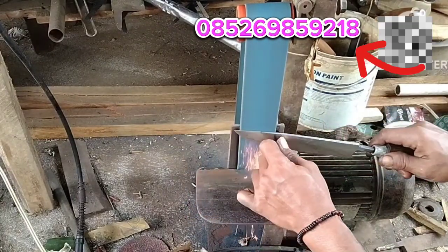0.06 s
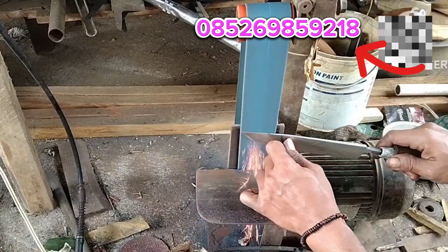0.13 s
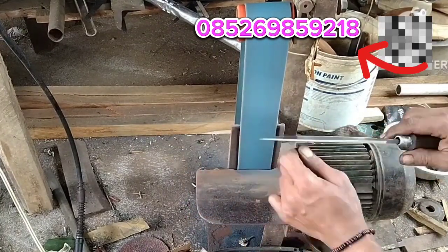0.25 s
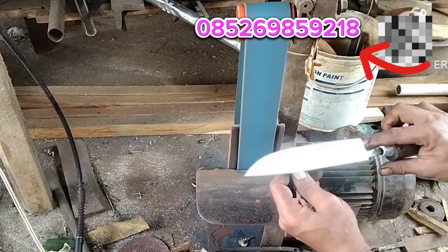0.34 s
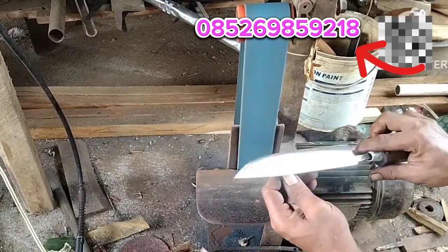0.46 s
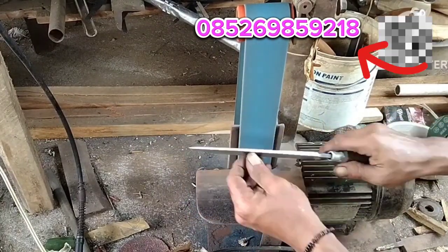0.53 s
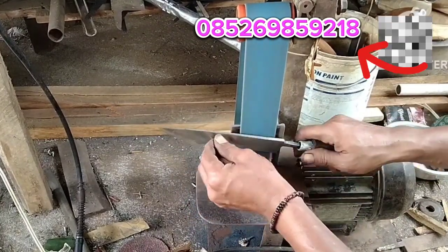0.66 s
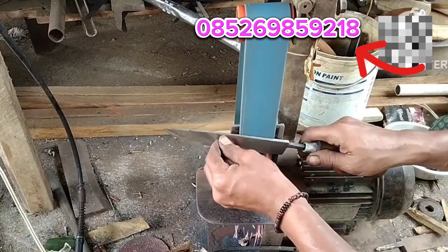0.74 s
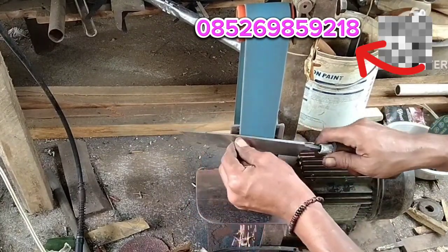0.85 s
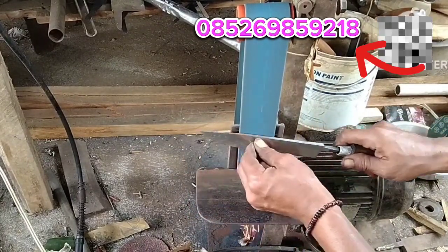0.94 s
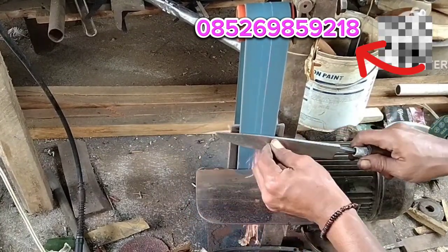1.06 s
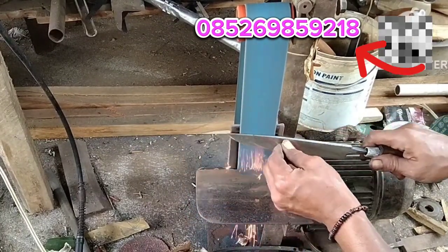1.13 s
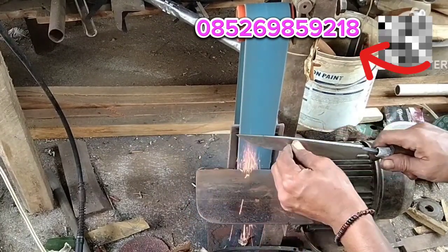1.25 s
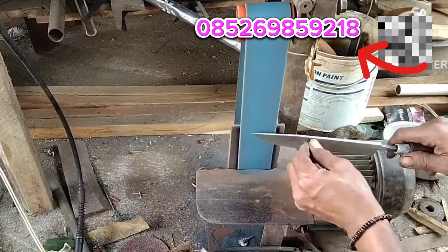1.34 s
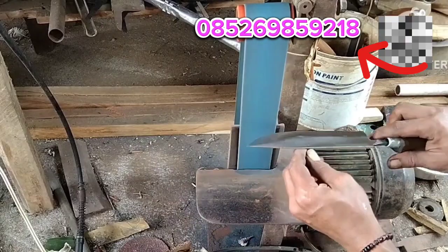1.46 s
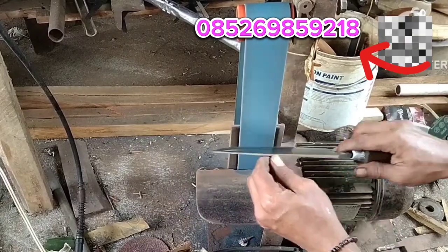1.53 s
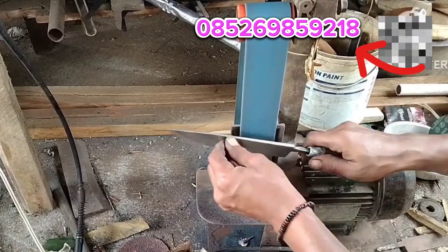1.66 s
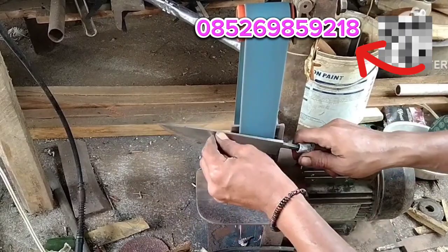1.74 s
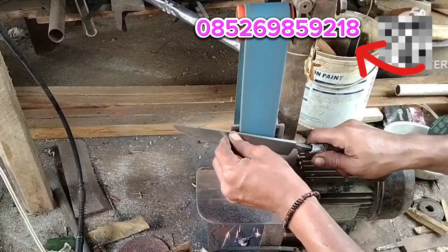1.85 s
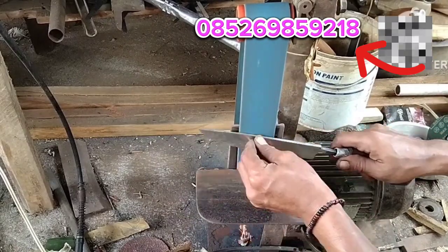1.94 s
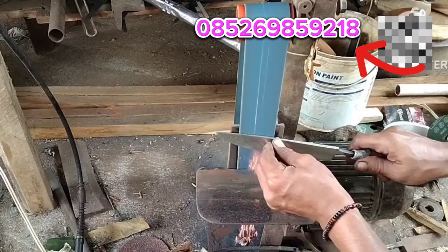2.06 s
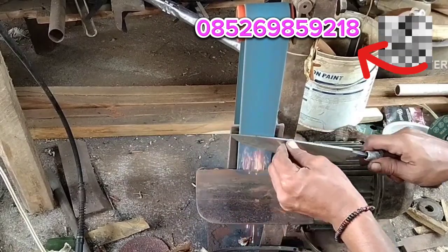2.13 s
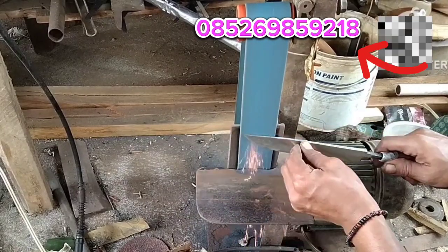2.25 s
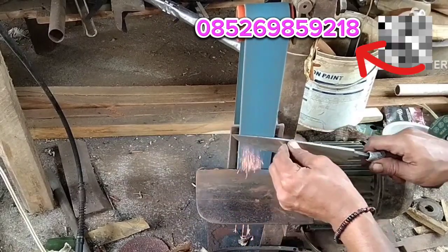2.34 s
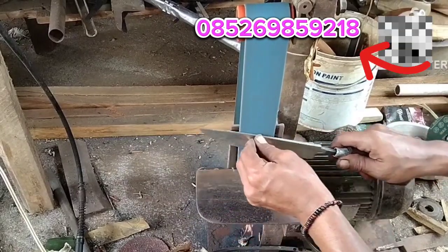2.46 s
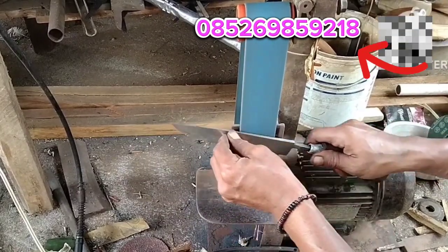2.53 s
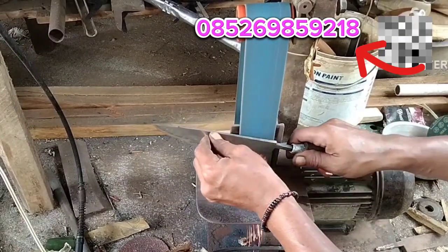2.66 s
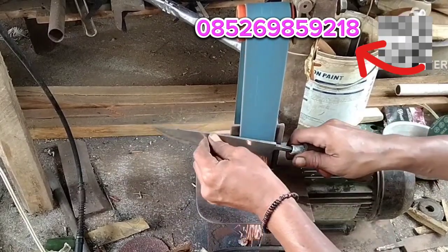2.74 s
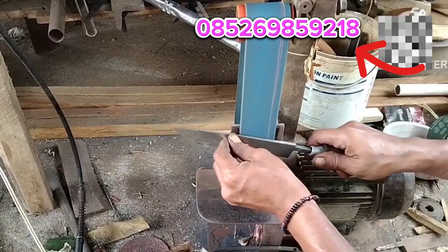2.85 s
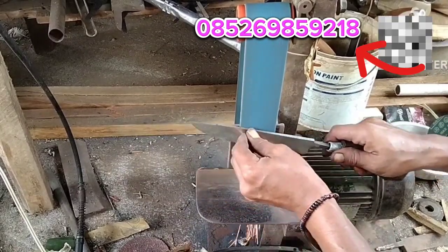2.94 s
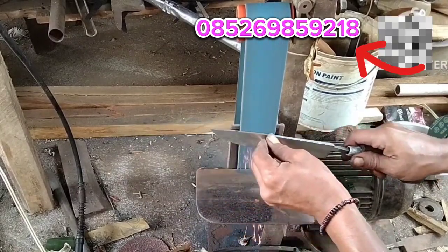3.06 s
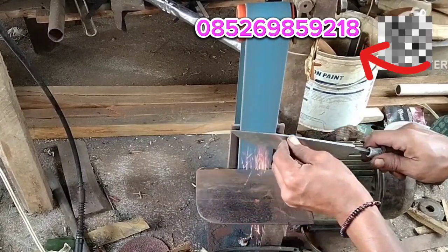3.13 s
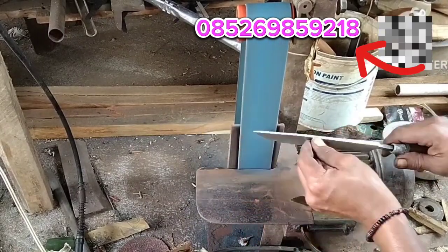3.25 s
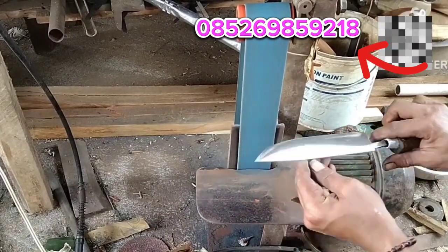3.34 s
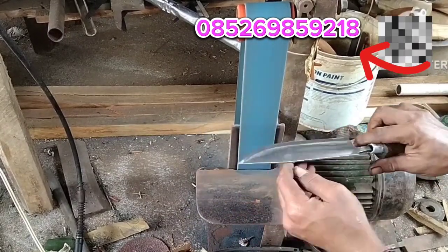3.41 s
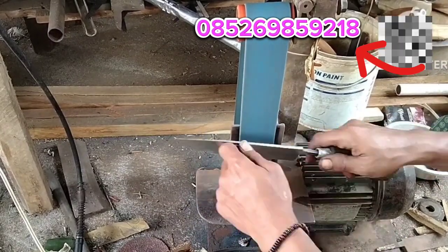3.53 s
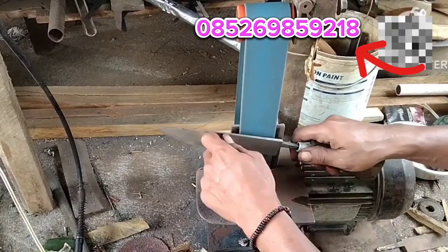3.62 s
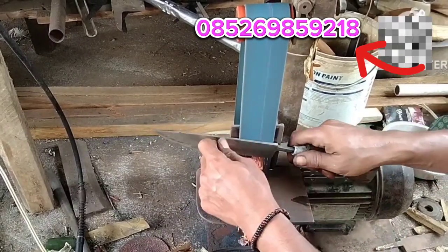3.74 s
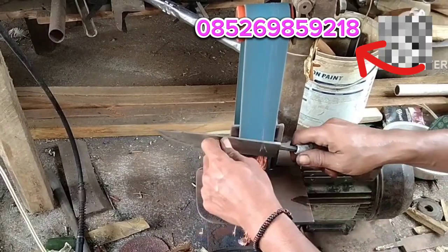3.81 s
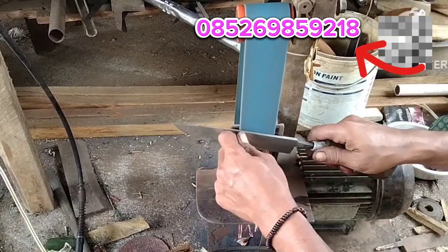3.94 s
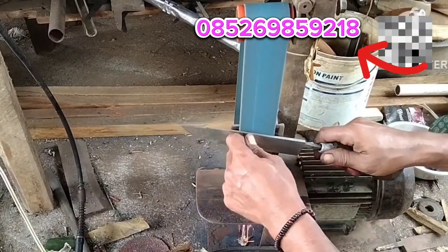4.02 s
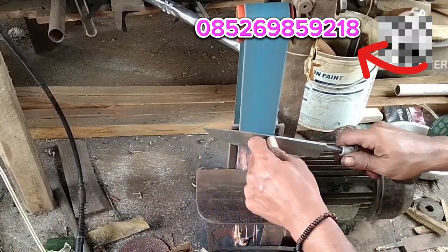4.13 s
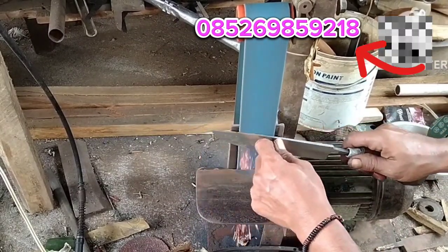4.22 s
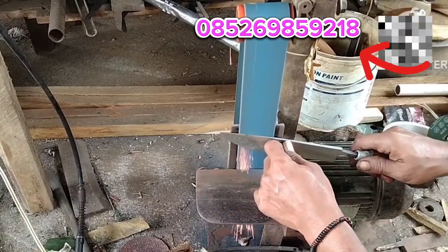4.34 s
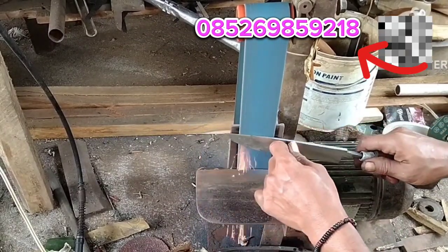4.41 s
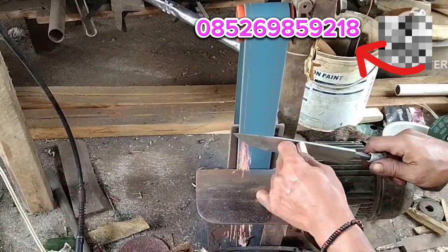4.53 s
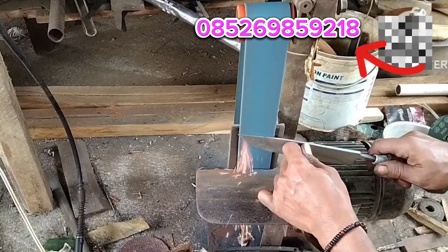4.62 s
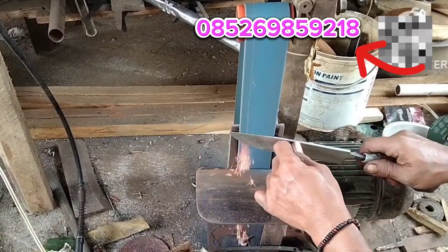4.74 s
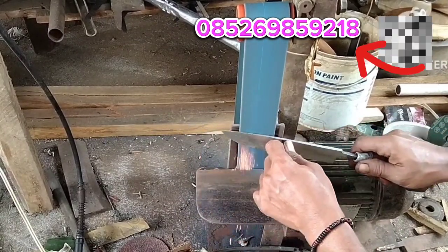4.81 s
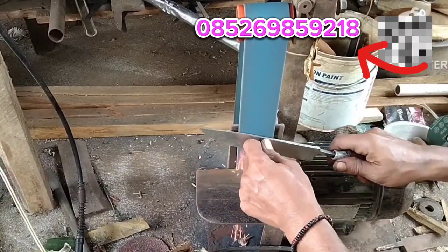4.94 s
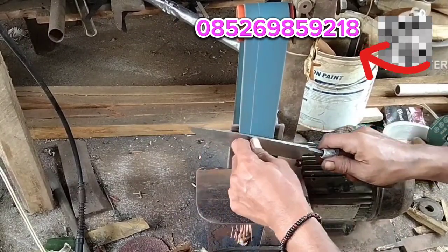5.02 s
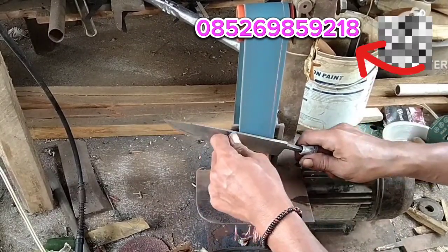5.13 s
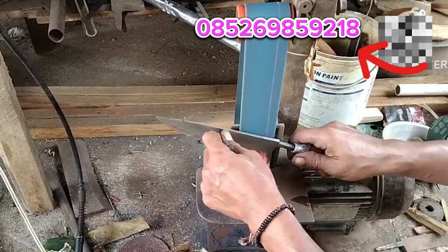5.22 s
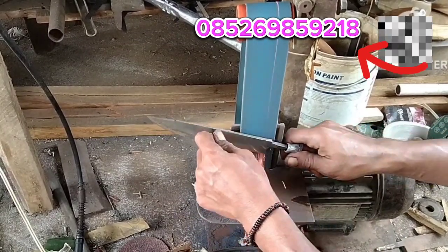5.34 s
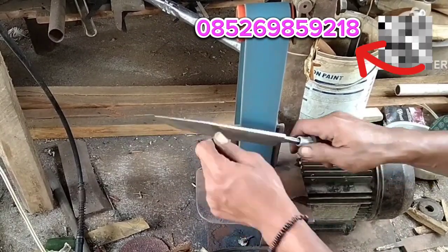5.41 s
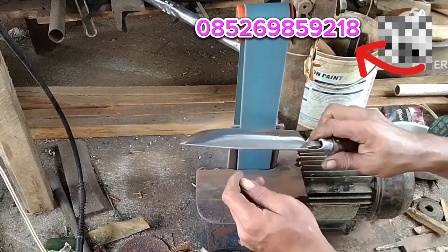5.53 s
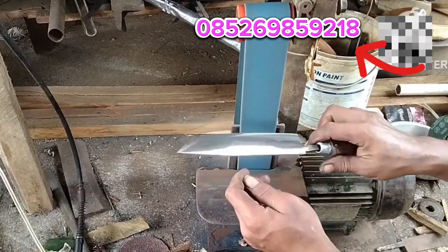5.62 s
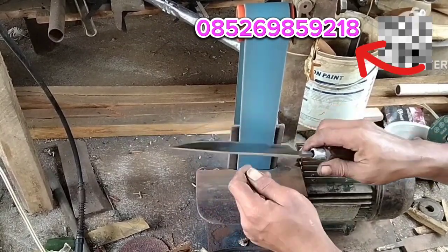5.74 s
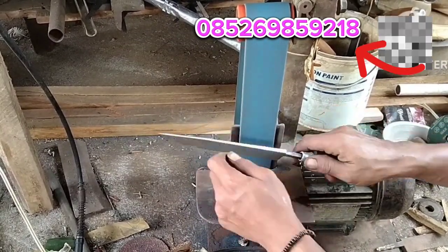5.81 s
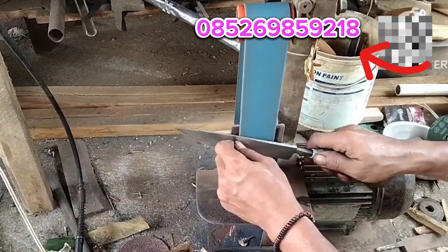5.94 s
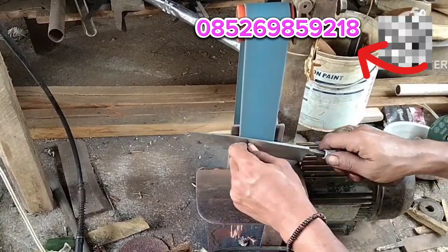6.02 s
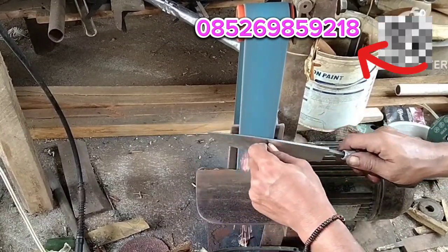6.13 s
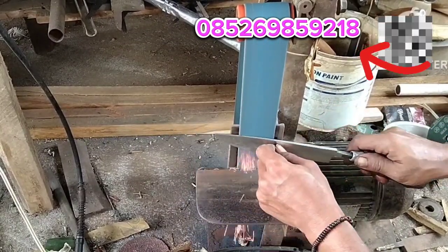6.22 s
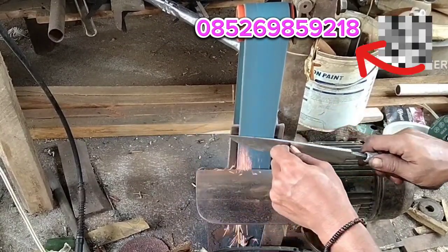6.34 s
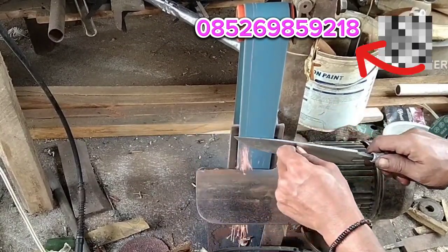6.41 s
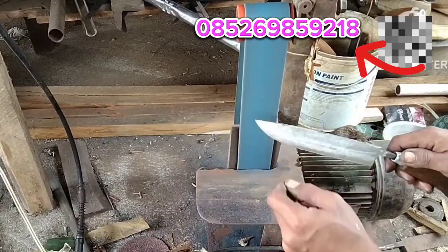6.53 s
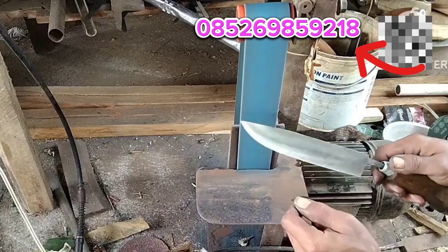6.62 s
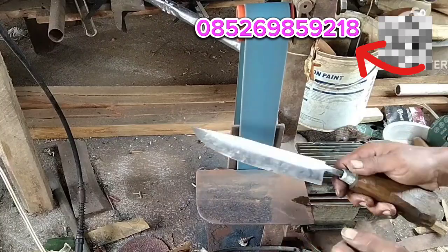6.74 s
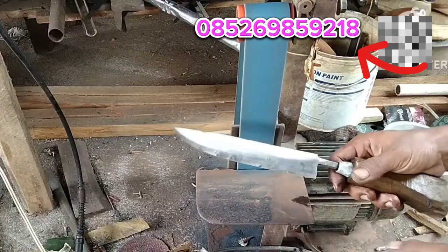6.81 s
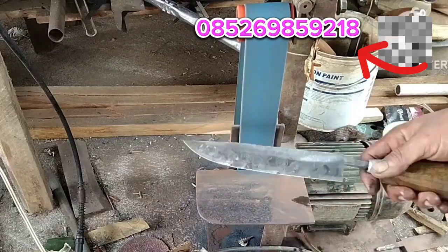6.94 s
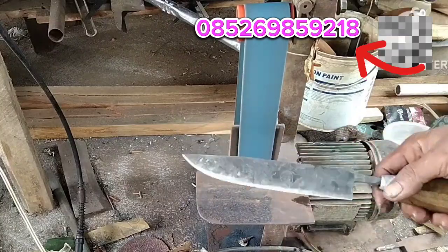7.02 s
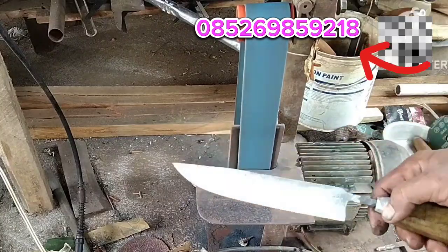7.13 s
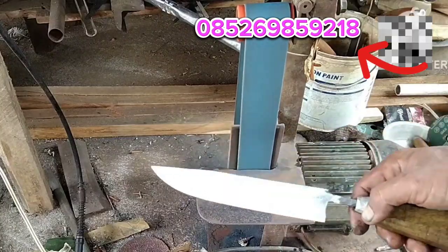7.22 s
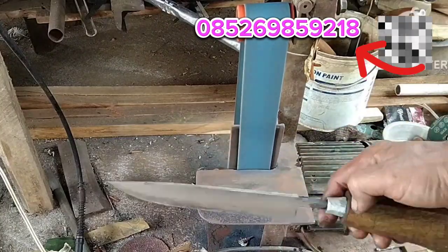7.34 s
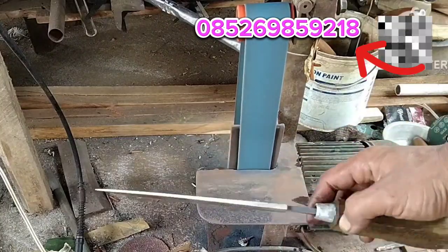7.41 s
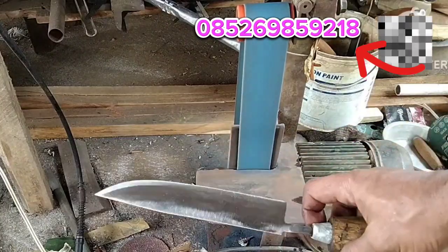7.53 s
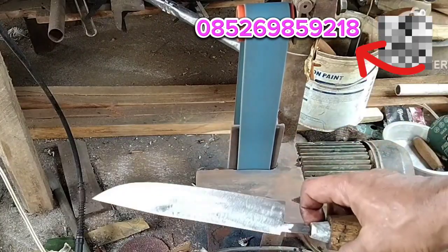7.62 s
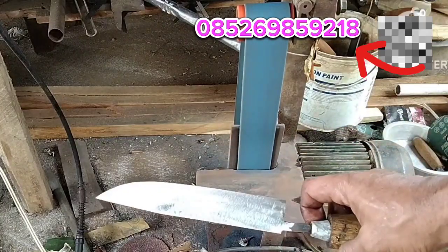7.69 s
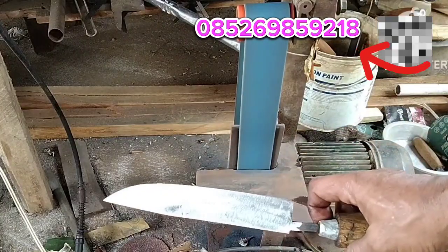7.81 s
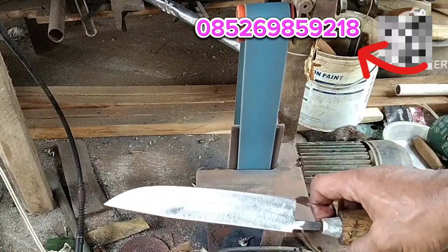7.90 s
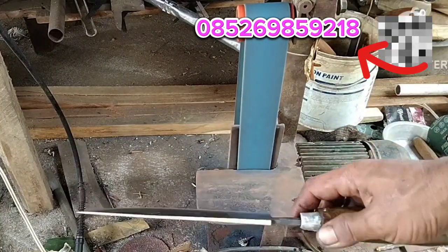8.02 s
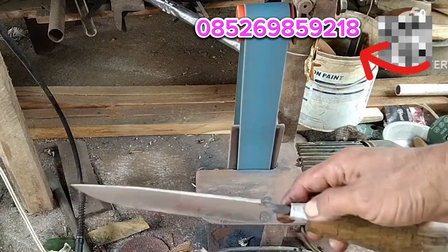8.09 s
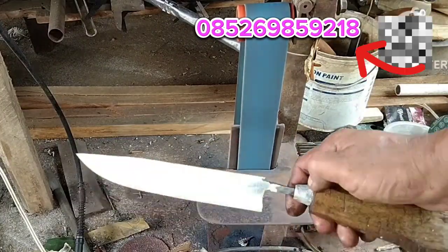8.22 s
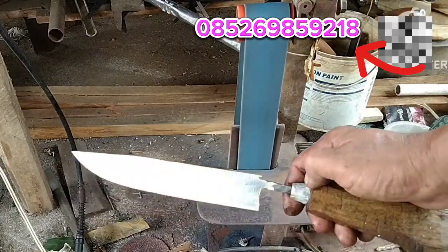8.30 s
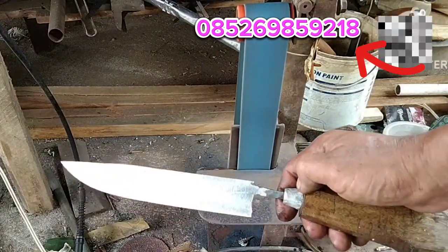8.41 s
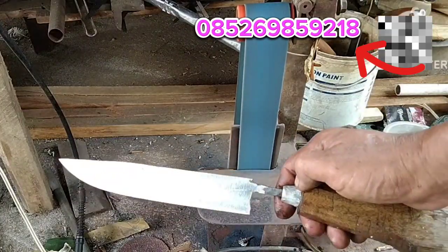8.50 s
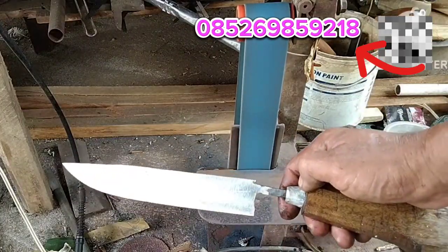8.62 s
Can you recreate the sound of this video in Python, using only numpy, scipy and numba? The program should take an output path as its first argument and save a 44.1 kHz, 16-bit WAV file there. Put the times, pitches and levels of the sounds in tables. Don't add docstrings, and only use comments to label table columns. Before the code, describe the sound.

Belt grinder whines steadily while a knife blade is pressed on in harsh, sizzling strokes of varying length, then lifts and leaves the belt spinning alone.

```python
import sys
import numpy as np
from scipy import signal
from scipy.fft import rfft, irfft
from scipy.io import wavfile
from scipy.ndimage import uniform_filter1d
from numba import njit

SR = 44100
rng = np.random.default_rng(int(sys.argv[2]) if len(sys.argv) > 2 else 0)


def field_ratio(decibels):
    return 10 ** (np.asarray(decibels, dtype=float) / 20)


def master_out(mix):
    frames = np.transpose(np.atleast_2d(mix))
    ceiling = np.clip(frames, -1, 1)
    pcm = np.round(ceiling * 32767).astype(np.int16)
    wavfile.write(sys.argv[1], SR, pcm)


N = 381906
TIME = np.arange(N) / SR
FREQ = np.arange(N // 2 + 1) * SR / N
ROLLER, CAGE = .38, .14


def level(x, db):
    return x * field_ratio(db) / np.sqrt(np.mean(x ** 2))


def walk(rate):
    hold = int(SR / rate)
    steps = np.repeat(rng.standard_normal(N // hold + 1), hold)
    return 1.48 * uniform_filter1d(uniform_filter1d(steps, hold), hold)[:N]


def colour(x, points):
    hz, db = np.transpose(points)
    return irfft(rfft(x) * field_ratio(np.interp(np.log(FREQ + 1), np.log(hz), db)), N)


def curves(table):
    s, *columns = np.transpose(table)
    return [np.interp(TIME, s, column) for column in columns]


def swells(rows):
    return sum(np.outer(db, np.clip(1.34 * (1 - np.abs(TIME - s) / half), 0, 1)) for s, half, *db in rows)


BAND_EDGES_HZ = [500, 950, 1400, 1650, 2800, 5200, 10000]


def split(x):
    below = [np.clip(.5 - 12 * np.log2((FREQ + 1) / hz), 0, 1) for hz in BAND_EDGES_HZ]
    return irfft(rfft(x) * np.diff([0 * FREQ] + below + [1 + 0 * FREQ], axis=0), N)


@njit
def svf(x, hz, width):
    y, band, low = np.empty(len(x)), 0., 0.
    for i in range(len(x)):
        g, k = np.tan(np.pi * hz[i] / SR), width / hz[i]
        v = (band + g * (x[i] - low)) / (1 + g * (g + k))
        band, low, y[i] = 2 * v - band, low + 2 * g * v, k * v
    return y


def grinding(turns, foot_hz):
    grit = rng.standard_normal(N) * field_ratio(1.06 * rng.exponential(1, N) + 0.23 * walk(55) + 0.5 * walk(20))
    blade = split(held_in_the_hand(blade_hiss(grit, foot_hz), foot_hz))
    frame = split(loaded_frame(grit, turns))
    return [*frame[:4], frame[4] + .9 * frame[5], blade[4] + blade[5], *blade[6:]]


# frequency in Hz, level in dB.
GRIND_HIGH = [(1590, -20), (2700, -1), (4160, -1.5), (4780, -4), (5690, -1.5), (6260, -6.5), (6930, -4.5),
              (8890, -1.5), (10000, -3.5), (12100, 1), (15500, -6)]
# frequency in Hz, width in Hz, level in dB.
BLADE = [(4274, 57, -1.5), (4190, 70, 2), (5510, 57, -4.5), (5835, 72, -1.5), (6160, 42, -4), (6830, 56, 5),
         (7265, 190, -2), (7730, 62, 2), (8340, 66, -2.5), (8480, 71, -3), (8700, 125, -9), (9110, 150, 0),
         (9320, 110, -9), (9630, 96, -3), (11640, 300, -4.5), (11870, 220, -8), (13000, 300, -3.5),
         (14700, 220, -3)]


def blade_hiss(grit, foot_hz):
    ring = 0
    for k, (hz, width, db) in enumerate(BLADE):
        mode = svf(grit, hz * (1 + 0.0051 * walk(3.0)), 0.4 * width)
        ring = ring + (-1) ** k * field_ratio(db + 3.6 * walk(4.93)) * mode
    lowest = svf(grit, 0.995 * foot_hz, 240.0) * field_ratio(7.8 * walk(10))
    hiss = level(colour(grit, GRIND_HIGH), -31.5)
    return hiss + level(ring, -39.0) + field_ratio(-2.5) * songs(grit) + level(lowest, -62.0)


# middle in seconds, half length in seconds, level in dB.
SONGS = [
    ((3600, 83), [(.05, 0.11, -51), (.8, 0.11, -47), (1.17, 0.12, -46), (1.9, 0.08, -57), (2.75, 0.35, -49), (3.8, 0.17, -43), (4.87, 0.097, -42), (5.2, 0.31, -44.5), (6.08, 0.08, -43), (6.3, 0.1, -46), (2.5, .06, -43), (4.33, 0.089, -43)]),
    ((4300, 35), [(1.1, 0.15, -45), (2.0, 0.11, -47), (2.35, .1, -44), (4.15, 0.28, -47.5), (4.7, 0.073, -43), (4.97, 0.13, -41), (6.33, .12, -40)]),
    ((5700, 110), [(.82, 0.14, -39.5), (1.15, 0.059, -37), (1.82, 0.12, -40), (2.15, 0.048, -43), (2.55, 0.03, -50), (2.85, 0.066, -39.5), (5.15, 0.15, -43), (6.1, 0.44, -41.5)]),
    ((6600, 70), [(.92, 0.13, -38), (2.52, 0.099, -45), (2.98, .18, -41), (4.6, 0.23, -43)]),
    ((7240, 97), [(.8, .1, -53), (1.88, 0.084, -51.5), (4.58, 0.25, -33.5), (5.05, .2, -42), (6.33, 0.2, -39.5)]),
    ((8320, 110), [(.78, 0.14, -44), (1.3, 0.064, -36), (2.28, 0.13, -39), (2.65, 0.091, -45), (3.2, 0.11, -47), (3.83, .2, -37), (5.25, 0.19, -38.5), (6.05, 0.085, -50)]),
    ((9200, 270), [(1.12, 0.25, -40), (2.15, 0.13, -47), (2.5, 0.13, -50), (2.93, .16, -43), (5.3, 0.13, -37), (6.12, 0.081, -39)]),
    ((11900, 390), [(1.25, .12, -46), (2.17, .12, -46), (3.78, .12, -47), (4.4, 0.26, -36), (4.7, 0.16, -43), (6.0, .06, -38), (6.3, .15, -41), (6.48, .05, -38)]),
]


def songs(grit):
    out = 0
    for (hz, width), rows in SONGS:
        size = sum(field_ratio(db) * swells([(s, half, 1)])[0] ** 2 for s, half, db in rows)
        out = out + size * level(svf(grit, hz * (1 + .004 * walk(3.94)), 1. * width), 0)
    return out


# middle in seconds, half length in seconds, hum in dB, casing in dB.
DUCKS = [(1.01, 0.27, -12.5, -24), (1.994, 0.14, -2.5, -15), (2.53, 0.073, -2, -12), (2.78, 0.24, -7.5, 3),
         (3.1, 0.093, -4.5, -2), (3.87, 0.19, -5, -1), (5.23, 0.29, -11, -9), (6.17, 0.12, -11, -6.5),
         (6.46, 0.33, -13, -7.5), (1.31, 0.085, -1.5, -5.5), (0.066, .15, -0.5, 0.5), (5.07, 0.08, -2, -9),
         (4.49, 0.22, -1, -3)]


def held_in_the_hand(blade, foot_hz):
    hz, s, spec = signal.stft(blade, SR, nperseg=512)
    at = np.minimum(s * SR, N - 1).astype(int)
    foot = (foot_hz + 60 * walk(28))[at]
    cut_db = (-23 + 0.18 * swells(DUCKS)[1] + 3.1 * walk(13))[at]
    below = np.clip((foot - hz[:, None]) / 320 + 0.53, 0, 1)
    return signal.istft(spec * field_ratio(cut_db * below), nperseg=512)[1][:N]


# frequency in Hz, level in dB.
GRIND_LOW = [(240, -70), (400, -30.5), (674, -26.5), (745, -26), (1050, -20.5), (1120, -22.5),
             (1210, -20.5), (1610, -25.5), (1870, -22.5), (2900, -27.5), (3770, -50), (6380, -120)]
LOADED_ORDERS = [1, 2, 3, 3.38, 3.76, 4, 5, 5.62, 6]
LOADED_DB = [-90, -61, -47, -62, -70.5, -62, -62, -71, -63]


def loaded_frame(grit, turns):
    rattle = colour(grit + level(ball_ticks(2 * np.pi * turns), -12.0), GRIND_LOW)
    return lines(turns, LOADED_ORDERS, LOADED_DB, 0.97, 0.11) + level(rattle, -57.5)


FREE_ORDERS = [1.0, 1.38, 1.62, 2.0, 2.24, 2.62, 3.0, 3.24, 3.38, 3.76, 4.38, 4.76, 5.0, 5.38, 5.62, 6.0,
               6.38, 6.76, 7.0, 8.38, 10.0, 10.14, 10.62, 10.72, 11.62, 12.0, 14.38, 16.76]
FREE_DB = [-75, -72.5, -70, -49, -64, -69, -43, -89, -52, -67, -76, -65, -58.5, -59.5, -56, -48.5, -61, -55,
           -60.5, -70, -56, -63, -63, -57.5, -56.5, -52.5, -64, -64]
# frequency in Hz, level in dB.
FREE_LOW = [(59, -80), (100, -65), (342, -26), (384, -43), (478, -35), (538, -18), (710, -14.5),
            (775, -13.5), (952, -16), (1190, -8), (1260, -8.5), (1610, -18.5), (2390, -10.5), (2980, -16.5),
            (3300, -25), (4290, -53), (7260, -120)]
FREE_HIGH = [(1760, -45), (3000, -21), (3490, -8.5), (3750, -9.5), (4190, -6.5), (4540, 3), (4880, -9),
             (5070, -7), (5650, -8.5), (6720, -15), (7200, -26), (9360, -48), (15800, -120)]
FREE_TOP = [(4240, -32), (7200, 0), (8280, -3), (9040, 0), (9820, -3), (12200, 1.5), (12900, 1),
            (13200, -5), (13900, -8), (14900, -1.5), (15400, -12.5)]


def running_free(turns):
    angle = 2 * np.pi * turns
    ticks = ball_ticks(angle)
    throb = 1 + 0.18 * np.sin(ROLLER * angle) + 0.14 * np.sin(CAGE * angle)
    rush = throb * rng.standard_normal(N)
    whine = lines(turns, FREE_ORDERS, FREE_DB, 0.7, 0.072)
    low = level(colour(rush + level(ticks, -10.5), FREE_LOW), -49)
    high = level(colour(rush + level(ticks, -12), FREE_HIGH), -41.5)
    top = level(colour(rush * field_ratio(0.97 * walk(70)), FREE_TOP), -46.5)
    return split(whine + low + high + top)


def lines(turns, orders, levels_db, wobble_db, flutter):
    out = 0
    for order, db in zip(orders, levels_db):
        phase = 2 * np.pi * (order * turns + rng.random()) + flutter * walk(40)
        out = out + field_ratio(db + wobble_db * walk(16)) * np.sin(phase)
    return out * np.sqrt(2)


def ball_ticks(angle):
    ticks = sum(np.cos(k * angle + k * k) for k in range(1, 19))
    swing = np.cos(ROLLER * angle) + 0.58 * np.cos(2 * ROLLER * angle)
    swing = swing + 0.71 * np.cos(CAGE * angle) + .5 * np.cos((ROLLER - CAGE) * angle)
    return ticks * swing


# time in seconds, sag of the ball-pass rate in Hz.
SAG = [
    [(0, 11.5), (.16, 10)],
    [(.64, 0), (.83, 13.3), (1.14, 14), (1.315, 8.5)],
    [(1.69, 0), (1.86, 11), (2.17, 12.4), (2.31, 4.8), (2.62, 15.6), (2.73, 16.2), (2.84, 20.5),
     (2.94, 16.8), (3.21, 14)],
    [(3.64, .5), (3.81, 13), (3.88, 15.8), (4.05, 11.6), (4.45, 10.4), (4.67, 7.7), (4.88, 12.2),
     (5.16, 14.3), (5.36, 17.5)],
    [(5.92, 0), (6.1, 10.4), (6.23, 11.8), (6.41, 10), (6.46, 7)],
]


def bearing_turns():
    free_hz, spin_up_s = 391.7, .045
    rows = [row for stroke in SAG for row in stroke + [(stroke[-1][0] + spin_up_s, 0)]]
    return np.cumsum(free_hz - uniform_filter1d(curves(rows)[0], size=800)) / SR


# touch in seconds, lift in seconds.
STROKES = [
    (-.1, .2),
    (0.686, 1.37),
    (1.74, 3.25),
    (3.654, 5.4),
    (5.946, 6.56),
]
FREE_BAND_DB = [-52.5, -46, -53, -44.5, -42, -43.5, -45.5]
FREE_DRIFT_DB_PER_S = [2, -2, -19.5, -0.35, -1.2, -0.73, -3]
# edge in dB, sizzle in dB.
LEARNT_DB = [(-.1, .6), (.3, -0.5), (.3, 0), (0.4, 0), (-0.69, -1), (-1.3, -1.4)]
# middle in seconds, half length in
# seconds, level in dB.
CHATTERS = [(.08, 0.17, 15.5), (.8, 0.076, 16), (1.86, 0.13, 16), (2.22, 0.15, 14.5), (2.46, .06, 14),
            (2.75, 0.21, 16), (3.23, 0.049, 7.5), (3.89, 0.27, 15), (4.36, 0.13, 9), (4.87, 0.13, 9),
            (5.38, 0.11, 10), (6.25, 0.19, 15), (6.9, 0.13, 7), (8.35, .2, 6)]
# middle in seconds, half length in seconds, level in dB.
WHINE_SHIFTS = [(0.73, 0.036, -4), (.17, .06, -4), (1.405, .03, -8), (5.44, .03, -5), (1.33, 0.13, -8),
                (3.3, 0.077, -10), (3.72, 0.058, -6), (7.7, 0.15, 2), (6.59, 0.027, -3), (1.95, 0.066, -4),
                (3.9, 0.17, 3), (4.95, 0.11, 3), (2.33, 0.12, -7.5), (4.53, 0.17, -6), (4.71, 0.14, -12),
                (5.17, 0.043, -3.5), (6.06, 0.11, -12.5), (6.5, 0.17, -13.5), (2.97, 0.45, 3)]


def free_levels():
    ons, offs = np.transpose(STROKES)
    begun = np.searchsorted(ons, TIME)
    since_lift = TIME - offs[begun - 1]
    free = np.c_[FREE_BAND_DB] + np.outer(FREE_DRIFT_DB_PER_S, np.clip(since_lift, 0, 2.5))
    lap_s, lap_low_s, lap_db = .58, 7.15, 1.5
    free[1] -= lap_db * np.cos(2 * np.pi * (TIME - lap_low_s) / lap_s)
    free[5:] += np.array(LEARNT_DB)[begun].T
    free[2] = np.maximum(free[2], -69) + 0.75 * swells(CHATTERS)[0]
    free[1] += swells(WHINE_SHIFTS)[0]
    return free


LOADED_BAND_DB = [-55.5, -42.5, -64, -51.5, -42.5, -38.5, -38.5]
PUSH_SHARE = [0.15, 0, 0.35, 0, 0.29, 0.65, 0.17]
TIP_DB_PER_KHZ = [1, 1, -0.85, 1, -1.3, -1.4, -1.5]
# middle in seconds, half length in seconds, sizzle in dB.
TILTS = [(.05, .3, -2), (1.26, 0.19, 1.5), (2.8, 0.48, -4), (4.05, 0.31, -4), (4.42, .14, 0),
         (4.64, 0.088, 3.5), (5.99, 0.053, 0.5), (6.27, 0.092, 1), (6.48, 0.054, 3.5)]
# middle in seconds, half length in seconds, body in dB, edge in dB.
LEANS = [(.76, .1, -1.5, 0.5), (1.31, 0.057, 0, -.5), (2.33, 0.1, -2, 0.5), (2.5, .07, -2.5, 2),
         (3.736, 0.012, 1.5, -0.5), (4.14, 0.17, 1, .5), (3.76, .06, -0.5, .5), (3.95, 0.13, 1.5, 0.5),
         (4.67, .11, -5.5, -4.5), (4.95, .1, 0.5, 2), (6.34, 0.12, -0.5, -1.5), (6.47, 0.063, -0.5, 0)]


def loaded_levels(push_db, foot_hz):
    loaded = np.c_[LOADED_BAND_DB] + np.outer(PUSH_SHARE, push_db)
    loaded = loaded + np.outer(TIP_DB_PER_KHZ, (foot_hz - 3400) / 1000)
    loaded[6] += swells(TILTS)[0]
    loaded[4:6] += swells(LEANS)
    hum_duck, casing_duck = swells(DUCKS)
    chatter = swells(CHATTERS)[0] + 0.18 * casing_duck
    loaded[:4] += [hum_duck, swells(WHINE_SHIFTS)[0], chatter, casing_duck]
    return loaded


# time in seconds, depth in dB, fall in seconds, recovery in seconds, share above the blade body.
DIPS = [(.21, -3.5, 0.037, 0.038, 0.49), (1.375, -11, 0.03, 0.024, 0.69), (3.28, 0, 0.037, 0.031, 0.46),
        (3.671, -8, 0.006, 0.04, 0.69), (3.722, -7.5, 0.05, 0.004, 0.9), (5.31, -1.5, 0.076, 0.068, 0.87),
        (5.414, -7, 0.049, 0.06, 0.37), (6.54, -5.5, 0.046, 0.033, 1.6), (8.62, 2.5, 0.36, .3, -0.79)]
DIP_SHARE = [0.41, 0.92, 1.6, 1.02, 1.65]


def gain_dips():
    out = 0
    for s, db, fall, back, top in DIPS:
        sinking = np.clip(1 - (s - TIME) / fall, 0, 1)
        shape = np.where(TIME < s, sinking, np.exp(-np.abs(TIME - s) / back))
        out = out + db * np.c_[DIP_SHARE + [top, top]] * shape
    return out


# start in seconds, peak in dB, frequency in Hz, cycles of ring.
BUMPS = [(.617, -52, 520, 1.5), (.638, -60, 400, 1.8), (0.6, -63, 289, 2.4), (3.674, -32, 520, 0.15),
         (3.690, -52, 380, 0.5), (3.704, -61, 330, 0.68), (3.719, -66, 360, .8), (6.963, -43, 3250, 2.6),
         (5.276, -51, 1520, 4.0), (5.384, -47, 1520, 5.0), (4.983, -50, 1520, 4.0), (4.922, -52, 1520, 4.0)]


def bumps():
    out = np.zeros(N)
    for s, db, hz, ring in BUMPS:
        cycles = np.clip(TIME - s, 0, 1) * hz
        out += field_ratio(db) * np.sin(2 * np.pi * cycles) * cycles / ring * np.exp(1 - cycles / ring)
    return colour(out, [(50, -38), (200, 1), (300, 3.5), (9000, 10)])


# middle in seconds, half length in seconds, notch depth in dB.
SHADES = [(.95, 0.07, -15), (1.2, 0.054, -18), (2.1, .12, -12), (2.53, 0.04, -2), (2.78, .12, -7),
          (3.18, .05, -7), (4.4, 0.072, -4), (4.63, 0.044, -14), (4.72, 0.044, -15), (5.3, 0.11, -16),
          (6.5, .06, -8)]


def port_notch(spec, hz, s):
    notch_hz = 5170 + 110 * np.interp(s, TIME, walk(12))
    depth_db = -3 + np.interp(s, TIME, swells(SHADES)[0])
    return spec * field_ratio(np.exp(-((hz[:, None] - notch_hz) / 220) ** 2) * depth_db)


# middle in seconds, half length in seconds, centre in
# Hz, level in dB.
HOLES = [(.14, 0.088, 2600, -17), (1.29, 0.13, 2700, -15), (1.336, 0.088, 3450, -13), (2.04, .1, 1870, -8),
         (2.15, .1, 2900, -5), (2.324, .06, 3250, -13), (2.68, .06, 2820, -6), (3.048, .06, 1830, -10),
         (3.12, .1, 2950, -5), (3.7, 0.03, 1800, -8), (3.87, .05, 2980, -9.5), (4.5, 0.079, 3150, -14),
         (4.63, .05, 2930, -12), (4.72, .09, 3300, -11), (5.3, .05, 3400, -11), (5.143, .05, 1720, -8),
         (5.23, 0.11, 2970, -16), (5.24, 0.24, 750, -12), (6.3, 0.07, 2700, -10), (6.404, 0.24, 764, -8),
         (6.42, .06, 3000, -10), (7.1, .05, 3400, -11), (6.92, 0.049, 2400, -15), (7.12, 0.11, 3130, -16),
         (7.405, 0.14, 8750, 0), (7.75, .08, 2900, -12), (7.7, 0.089, 7600, -17.5),
         (8.47, 0.12, 10000, -13), (7.13, 0.15, 1330, -11), (7.8, 0.15, 1280, -13), (7.7, 1.4, 14300, -2),
         (5.9, 0.33, 13600, -3), (4.45, 0.12, 6300, -3), (2.3, .2, 6500, -3), (1.12, 0.23, 6700, -5),
         (2.697, 0.089, 2250, -10), (4.8, 0.22, 1820, -7), (7.7, 0.62, 7500, -3.5), (5, 0.34, 1900, -8),
         (6.93, .035, 3200, -12), (6.9, .14, 1320, 7), (2.13, 0.11, 2300, -10), (2.6, .1, 2280, -6),
         (1.26, .06, 2400, -8), (1.28, .08, 1900, 5.5), (2.99, .06, 2950, 7), (0.96, .03, 2580, -7),
         (6.12, .06, 1850, -10), (6.4, .04, 3250, -10), (1.25, 0.037, 2930, 4)]


def dig_holes(spec, hz):
    s = np.arange(spec.shape[1]) * 512 / SR
    gain_db = 0
    for at, half, mid_hz, db in HOLES:
        shape = np.exp(-((hz / mid_hz - 1) / 0.056) ** 2)
        gain_db = gain_db + np.outer(shape, np.interp(s, TIME, swells([(at, half, db)])[0]))
    return spec * field_ratio(gain_db)


def close_bass(spec, hz, s):
    busy = sum(np.clip((s - on - .08) / 0.045, 0, 1) * (s < off) for on, off in STROKES)
    gain_db = -13 * busy + 3.5 * np.interp(s, TIME, walk(11)) + 4.0
    return spec * field_ratio(np.outer(np.clip((210 - hz) / 90, 0, 1), gain_db))


def blur(a):
    return uniform_filter1d(uniform_filter1d(a, size=6, axis=0), size=3, axis=1)


def eat_patches(spec, hz, patch):
    near_db = 10 * np.log10(blur(np.abs(spec) ** 2) + 1e-14)
    around_db = uniform_filter1d(np.maximum(near_db, -100), size=40, axis=0)
    margin_db = np.where(hz > 5600, 7.5, 3.0)[:, None]
    floor_db = np.interp(hz, [6300, 6470, 13900, 14600], [-110, -66.5, -74.0, -82])[:, None]
    gate_db = np.maximum(around_db - margin_db, floor_db)
    dig_db = np.clip(1.92 * (gate_db - near_db - 5.94 * patch), 0, 18) * np.clip(hz / 900, 0, 1)[:, None]
    mottle_db = 2.0 * patch * np.clip(hz / 3000, 0, 1)[:, None]
    reach = (hz < 15550) * np.clip(hz / 190, .3, 1)
    return spec * field_ratio(mottle_db - dig_db) * reach[:, None]


def drop_faint_treble(spec, patch):
    bands = spec[304:336].reshape(4, 8, -1)
    power = uniform_filter1d(np.mean(np.abs(bands) ** 2, axis=1), size=4, axis=1)
    band_db = 10 * np.log10(power + 1e-14)
    heard = band_db + 4.0 * patch[304:336:8] > -83
    spec[304:336] = (bands * heard[:, None]).reshape(32, -1)
    return spec


# time in seconds, push in dB, lowest pitch in Hz at which the held blade still radiates.
GRIP = [
    [(0, 2, 3060), (.2, 4, 3630)],
    [(.7, 5, 3170), (.86, 2, 3330), (.92, 2.5, 2890), (.97, -0.5, 3300), (1.08, 1, 3950), (1.16, -2, 3410),
     (1.21, -5, 3370), (1.25, -4, 2930), (1.3, -1.5, 4220)],
    [(1.76, 5, 3150), (1.89, 3.5, 3000), (1.97, 2.5, 3440), (2.38, -1.5, 3500), (2.52, 2, 2790),
     (2.63, 1.5, 3400), (2.99, 1.5, 2770), (3.08, 2, 3380), (3.22, 1.5, 3420)],
    [(3.74, 1.5, 3240), (3.9, -2, 3260), (4.02, 1.5, 2850), (4.28, 1.5, 3000), (4.41, 2, 3000),
     (4.5, -1.5, 3550), (4.7, 2, 3900), (4.86, 0, 3410), (5.36, 1.7, 3180)],
    [(5.98, 4, 3480), (6.11, 3.5, 3240), (6.17, 2, 3540), (6.33, -2.5, 3300), (6.44, 1, 4000),
     (6.52, -4.5, 4260)],
]
TOUCH_S = [.13, 0.054, .056, 0.12, 0.053, 0.054, 0.044]


def scene():
    touch = sum(np.clip((TIME - on) / np.c_[TOUCH_S], 0, 1) * np.clip((off - TIME) / 0.011, 0, 1)
                for on, off in STROKES)
    turns = bearing_turns()
    push_db, foot_hz = curves(sum(GRIP, []))
    loaded = grinding(turns, foot_hz)[1:]
    rumble, *free = running_free(turns)
    dip = gain_dips()
    free_db, loaded_db = free_levels() + dip, loaded_levels(push_db, foot_hz) + dip
    mono = 0
    for on, a, b, a_db, b_db in zip(touch, free, loaded, free_db, loaded_db):
        mono = mono + np.sqrt(1 - on) * field_ratio(a_db) * level(a, 0) + np.sqrt(on) * field_ratio(b_db) * level(b, 0)
    rumble_db = -6.5 * touch[1] + swells([(2.55, 1, 4), (3.7, .1, 3)])[0] + 1.2 * walk(6.0)
    mono = mono + level(rumble, -69.5) * field_ratio(rumble_db)
    return np.tile(mono + bumps(), (2, 1))


def low_pass(x):
    return signal.sosfilt(signal.butter(12, 16730, fs=SR, output="sos"), x)


def record(dry):
    hz, s, spec = signal.stft(np.tanh(11 * dry[0]) / 11, SR, nperseg=1024)
    spec = port_notch(spec, hz, s)
    spec = dig_holes(spec, hz)
    spec = close_bass(spec, hz, s)
    patch = blur(rng.standard_normal(spec.shape))
    patch = patch / patch.std()
    spec = eat_patches(spec, hz, patch)
    spec = drop_faint_treble(spec, patch)
    mono = signal.istft(spec, nperseg=1024)[1][:N]
    return low_pass(np.tile(mono, (2, 1)))


dry = scene()
out = record(dry)
master_out(out)
```